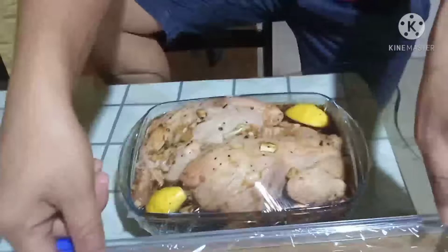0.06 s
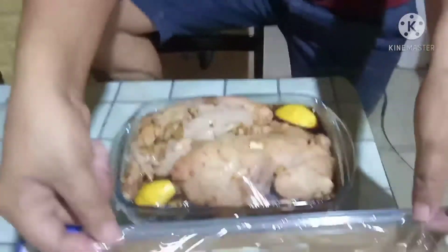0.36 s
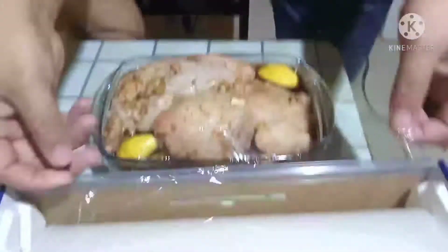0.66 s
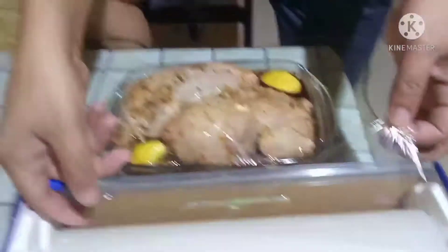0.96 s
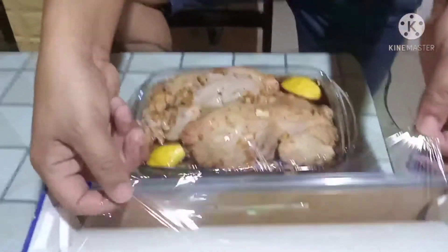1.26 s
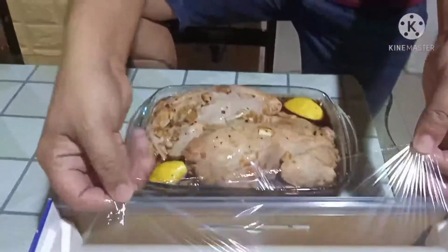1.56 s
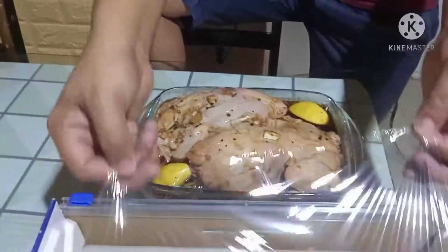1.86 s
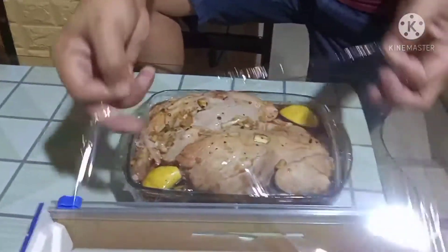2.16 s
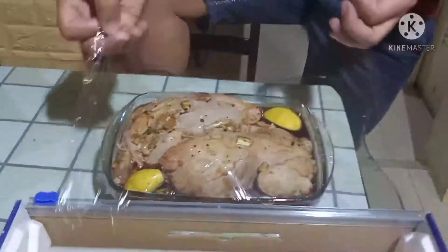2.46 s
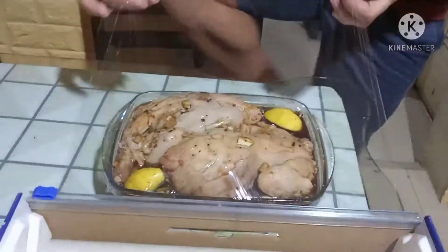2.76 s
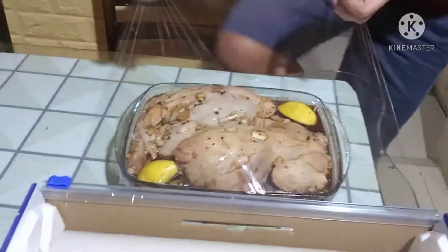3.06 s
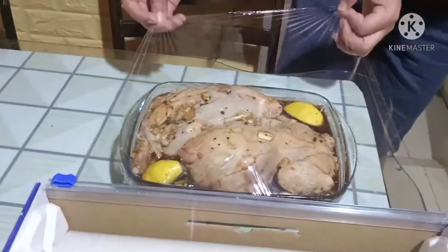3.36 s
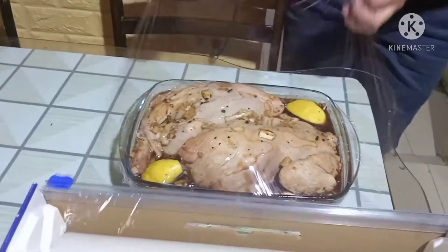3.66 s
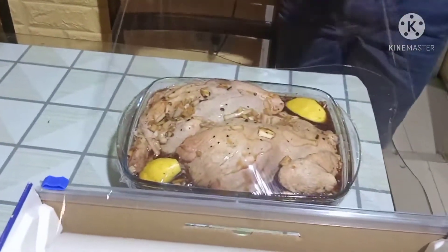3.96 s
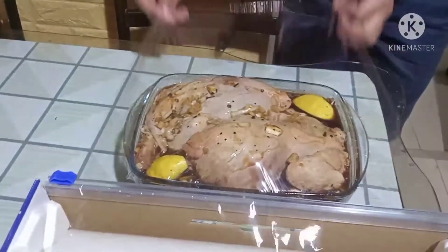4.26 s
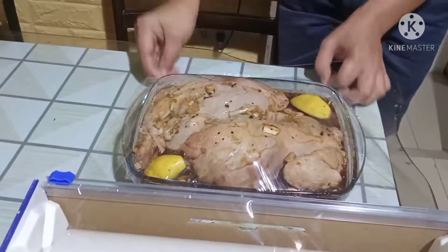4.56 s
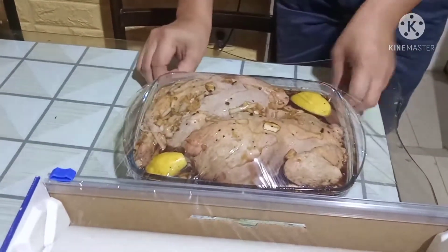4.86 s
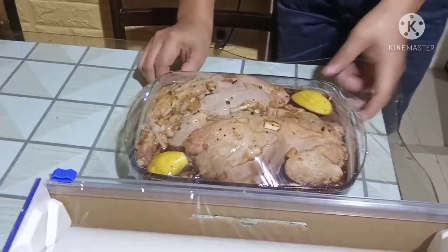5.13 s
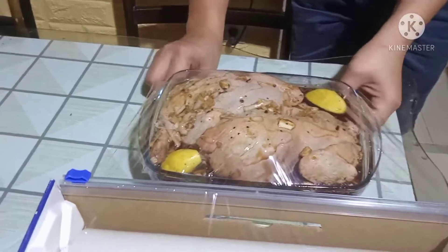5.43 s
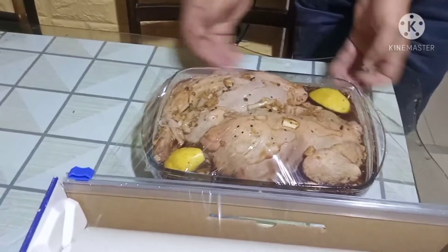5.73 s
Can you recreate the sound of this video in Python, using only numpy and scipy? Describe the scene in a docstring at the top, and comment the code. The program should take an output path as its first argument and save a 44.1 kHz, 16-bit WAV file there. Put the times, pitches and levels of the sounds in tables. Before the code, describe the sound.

Close up, dull taps on a cardboard dispenser mix with bright little ticks as the edge of some plastic wrap is picked up. It peels with a fine hiss, a low flutter and soft bumps from the roll, then squeaks and rips loose loudly. The stretched sheet snaps several times and finally crinkles quietly around a dish's rim. A fan hums steadily in the slightly echoing kitchen.

```python
"""First come knocks on a cardboard box and soft crinkles, over the hum of a fan in a small kitchen.
Cling film ticks as its edge is picked up, then hisses off the roll in countless tiny slips.
The stretched sheet flutters and the roll bumps round in the box. Stuck film squeaks, creases snap,
and two hard tugs rip it loose in a loud rasp. Last, it crinkles as it is pressed over a dish's rim."""
import sys
import numpy as np
from scipy import signal
from scipy.fft import rfft, irfft
from scipy.io import wavfile
from scipy.ndimage import uniform_filter1d

SR = 44100
rng = np.random.default_rng(int(sys.argv[2]) if len(sys.argv) > 2 else 0)


def wav_record(signal):
    """Record a signal, one row per channel, as 16-bit PCM in the file named by sys.argv[1]."""
    frames = np.transpose(np.atleast_2d(signal))
    bounded = np.clip(frames, -1, 1)
    # unit amplitude maps onto the largest positive 16-bit level
    quanta = np.round(bounded * 32767).astype(np.int16)
    wavfile.write(sys.argv[1], SR, quanta)


N = 264335
TIME = np.arange(N) / SR


def from_db(db):
    """Turn decibels into a number to multiply by."""
    return 10 ** (np.asarray(db) / 20)


def rms_one(x):
    """Scale a sound so that its average strength (rms) is 1."""
    return x / np.sqrt(np.mean(x ** 2) + 1e-20)


def steadied(x, seconds):
    """Even out a sound, holding its strength near 1 over each stretch of this length."""
    power = uniform_filter1d(x ** 2, max(2, int(seconds * SR)))
    return x / np.sqrt(np.maximum(power, 1e-4 * np.mean(x ** 2)))


def at_hz(points, hz):
    """Read between the rows of a frequency table, giving each octave equal room."""
    row_hz, value = np.transpose(points)
    return np.interp(np.log(np.maximum(hz, 1)), np.log(row_hz), value)


def add(out, s, sound):
    """Mix a sound in at s seconds."""
    start = max(0, round(s * SR))
    out[start:start + len(sound)] += sound[:N - start]


def band(x, low_hz, high_hz):
    """Keep what lies between two frequencies."""
    bandpass = signal.butter(2, [low_hz, min(high_hz, .45 * SR)], "band", fs=SR, output="sos")
    return signal.sosfilt(bandpass, x + 1e-18)


def coloured(x, spectrum, size=4096):
    """Give a sound the tone colour listed in a table."""
    gains = from_db(at_hz(spectrum, np.arange(size // 2 + 1) * SR / size))
    cepstrum = irfft(np.log(gains))
    cepstrum[1:size // 2] *= 2   # fold the filter so that nothing sounds early (minimum phase)
    cepstrum[size // 2 + 1:] = 0
    return signal.fftconvolve(x, irfft(np.exp(rfft(cepstrum))))[:len(x)]


def registers(x, splits_hz=(900, 5000)):
    """Split a sound into body (low), crack (middle) and sizzle (high)."""
    lowpasses = [signal.butter(3, hz, fs=SR, output="sos") for hz in splits_hz]
    body, body_and_crack = (signal.sosfiltfilt(lowpass, x, padtype=None) for lowpass in lowpasses)
    return body, body_and_crack - body, x - body_and_crack


def envelope(s, length_s, rise_s, fade_s):
    """Rise evenly from time s, hold until length_s is over, then die away."""
    age = TIME - s
    return np.clip(age / rise_s, 0, 1) * np.exp(-np.clip((age - length_s) / fade_s, 0, 30))


def slips(per_s, spread_db):
    """The film lets go in tiny random jumps: many weak, a few strong."""
    sizes = from_db(spread_db * np.minimum(rng.exponential(1, N), 4)) * rng.choice([-1, 1], N)
    return sizes * (rng.random(N) < per_s / SR)


def burst(decay_s, scatter, size=4096):
    """A sharp click, then chatter that swells and dies; scatter sets how strong the chatter is."""
    age = np.arange(size) / (decay_s * SR)
    chatter = rng.standard_normal(size) * age ** .5 * np.exp(-age)
    return signal.unit_impulse(size) + scatter * chatter / np.linalg.norm(chatter)


# tone colour of the moving air: (frequency [Hz], level [dB])
AIR_COLOUR = [(25, -41), (58, 6), (78, -13.5), (98, -4.5), (125, -1), (350, 0), (550, -9), (800, -6),
              (1250, -15), (2200, -15), (3400, -21), (5000, -34), (6400, -46), (8600, -39), (11000, -50.5),
              (15000, -46)]
# the fan motor's tones: (pitch [Hz], level [dB])
MOTOR_TONES = [(150.7, -48.5), (301.5, -57), (586.8, -49.5), (802.1, -53)]
def fan(air_db, hum_db, waver):
    """A fan makes a steady rush of air and a few slightly wavering motor tones."""
    air = rms_one(coloured(rng.standard_normal(N), AIR_COLOUR))
    hum = np.zeros(N)
    for hz, db in MOTOR_TONES:
        drift = waver * np.cumsum(rng.standard_normal(N)) / np.sqrt(SR)
        hum += from_db(db) * np.sin(2 * np.pi * hz * TIME + drift)
    return from_db(air_db) * air + from_db(hum_db) * hum


# tone colour of small creases: (frequency [Hz], level [dB])
CREASE_COLOUR = [(70, -25), (300, -2), (1800, 0), (3300, -4), (5500, -21), (9000, -20), (12000, -23),
                 (15000, -19), (17500, -50)]
# fingers handle the film: (time [s], length [s], body and crack level [dB], sizzle level [dB])
FINGER_GRIPS = [(0.0, 0.06, -30.5, -55), (0.192, .04, -37.5, -58), (0.288, 0.17, -42, -67),
                (0.506, 0.072, -36, -41), (.6, 0.15, -44, -74), (1.685, 0.039, -36, -59.5),
                (3.098, 0.018, -26, -38), (4.107, 0.017, -30, -38), (4.149, 0.022, -28.5, -46),
                (5.285, .025, -39.5, -44), (5.377, .04, -43.5, -45.5), (5.509, 0.17, -43.5, -44),
                (5.654, 0.054, -28.5, -35)]
def crinkles(body_db, crack_db, sizzle_db, idle_per_s=500, busy_per_s=5000):
    """Small creases form as the film is gripped and smoothed; firmer handling makes more of them."""
    firmness, brightness = np.zeros((2, N))
    for s, length, crack_level, sizzle_level in FINGER_GRIPS:
        grip = envelope(s, length, rise_s=0.008, fade_s=0.028)
        firmness += from_db(crack_level) * grip
        brightness += from_db(sizzle_level) * grip
    per_s = idle_per_s + busy_per_s * firmness / firmness.max()
    creases = coloured(slips(per_s, spread_db=3.0), CREASE_COLOUR)
    body, crack, sizzle = (steadied(part, 0.05) for part in registers(creases))
    crunch = from_db(body_db) * body + from_db(crack_db) * crack
    return firmness * crunch + brightness * from_db(sizzle_db) * sizzle


# tone colour of knocked cardboard: (frequency [Hz], level [dB])
CARDBOARD_COLOUR = [(60, -21), (150, -12), (300, -7.5), (520, -4.5), (850, 6.5), (1250, -2), (1800, 5),
                    (2700, 1), (3700, -7), (5500, -32), (8700, -39), (15000, -36)]
# taps on the box and the table: (time [s], knock level [dB], boom level [dB])
BOX_TAPS = [(.001, -6, -15.5), (.011, -17, -14.5), (.044, -11.5, -22.5), (.199, -19, -26.5),
            (.229, -18.5, -27.5), (.738, -10, -34), (.784, -22, -45), (.798, -11.5, -20),
            (.814, -13.5, -21.5), (.864, -12.5, -45), (.982, -22, -33), (1.019, -22, -45),
            (1.083, -22, -47), (1.288, -29, -23.5), (3.247, -28.5, -43), (5.144, -23, -27.5)]
def taps(knock_db, knock_s, boom_db, boom_s, scatter):
    """Cardboard gives a short, dull knock; the hollow box booms a little longer."""
    out = np.zeros(N)
    for s, knock_level, boom_level in BOX_TAPS:
        knock = rms_one(coloured(burst(knock_s, scatter), CARDBOARD_COLOUR))
        boom = rms_one(band(burst(boom_s, scatter), 143, 450))
        add(out, s, from_db(knock_level + knock_db) * knock + from_db(boom_level + boom_db) * boom)
    return out


# tone colour of a tiny wrinkle very close by: (frequency [Hz], level [dB])
WRINKLE_COLOUR = [(500, -31), (1400, -3), (2500, 14.5), (3500, 10.5), (5500, -10.5), (9000, -12),
                  (12000, -10), (15000, 0.5), (17000, -35)]
# the sharpest wrinkles: (time [s], level [dB])
SHARP_TICKS = [(0.231, -32.5), (.3044, -37), (.354, -36.5), (0.391, -31.5), (.412, -25), (0.5095, -27.5),
               (0.5292, -23), (.543, -21), (.5498, -26), (.557, -26), (0.572, -29), (.7833, -32),
               (0.8145, -31.5)]
def ticks(level_db, decay_s, scatter, start_s=0.2, length_s=0.49, faint_per_s=50):
    """Wrinkles click brightly as the film's edge is picked up: a few sharp ones among many faint."""
    count = round(faint_per_s * length_s)
    faint = [(start_s + length_s * (k + rng.random()) / count, rng.normal(-39.5, 0.5))
             for k in range(count)]   # same columns as the sharp ticks
    out = np.zeros(N)
    for s, db in SHARP_TICKS + faint:
        tick = coloured(burst(decay_s, scatter), WRINKLE_COLOUR)
        add(out, s, from_db(db + level_db) * rms_one(tick))
    return out


# tone colour of peeling film: (frequency [Hz], level [dB])
HISS_COLOUR = [(300, 16.5), (800, 14.5), (1200, 7), (2400, 9), (3600, 3), (5500, -15), (8700, -15.5),
               (15500, -28.5)]
# quiet pulls on the film: (time [s], length [s], level at the end [dB])
GENTLE_PULLS = [(0.877, 0.18, -46), (1.3, 0.63, -44.5), (1.988, 0.38, -35), (2.792, 0.23, -39.5),
                (3.024, 0.097, -34), (3.95, 0.16, -39.5)]
def peel(growth_db_per_s):
    """Slow peeling is a fine hiss of countless slips; it grows as each pull gathers speed."""
    hiss = rms_one(coloured(slips(per_s=3000, spread_db=2.5), HISS_COLOUR))
    pulling = np.zeros(N)
    for s, length, end_db in GENTLE_PULLS:
        seconds_left = np.maximum(s + length - TIME, 0)
        growth = from_db(end_db - growth_db_per_s * seconds_left)
        pulling += growth * envelope(s, length, rise_s=0.022, fade_s=0.087)
    return pulling * hiss


# deep tone colour of the stretched sheet: (frequency [Hz], level [dB])
SHEET_COLOUR = [(20, -59.5), (35, -32), (60, -0.5), (110, 2), (165, -2), (240, -11.5), (400, -32.5),
                (600, -50), (850, -31), (1200, -45), (3000, -70.5)]
# moves of the hands that shake the sheet: (time [s], length [s], level [dB])
HAND_MOVES = [(1.267, 0.051, -23), (1.40, 0.25, -19.5), (1.777, 0.2, -19), (2.089, 0.044, -20),
              (2.201, 0.085, -24), (2.423, .3, -25), (2.748, 0.43, -13.5), (3.228, 0.2, -29),
              (3.405, 0.1, -15), (3.563, .05, -16.5), (3.687, 0.14, -27.5), (4.195, 0.063, -23),
              (4.327, 0.057, -24), (4.452, 0.16, -46)]
def flutter(level_db, puff_db=3.5):
    """The wide sheet wobbles like a slack drumhead while the hands move it, in uneven puffs."""
    motion = sum(from_db(db) * envelope(s, length, rise_s=0.019, fade_s=0.029)
                 for s, length, db in HAND_MOVES)
    wobble = rms_one(band(rng.standard_normal(N), 11.6, 30.7))
    puffs = from_db(puff_db * np.tanh(wobble))
    rumble = steadied(coloured(rng.standard_normal(N), SHEET_COLOUR), 0.021)
    return from_db(level_db) * motion * puffs * rumble


# the roll hits its box as the film is tugged: (time [s], level [dB], pitch [Hz])
ROLL_BUMPS = [(1.315, -7.5, 107), (1.485, -9, 112), (1.504, -6, 116), (1.804, -10, 80), (1.913, -3.5, 146),
              (1.974, -1, 131), (2.254, -5, 113), (2.714, -3, 173), (2.745, -1.5, 124), (2.774, -8.5, 177),
              (2.91, 1, 132), (3.017, -2.5, 111), (3.162, -3.5, 97), (3.413, -7, 183), (3.441, -4.5, 152),
              (3.972, -20.5, 89), (4.22, -7, 106)]
def bumps(level_db, swell_s, rattle_db, size=4096):
    """The roll makes soft thuds that swell and die quickly, with a little cardboard rattle."""
    out = np.zeros(N)
    age = np.arange(size) / SR
    swell = (age / swell_s * np.exp(1 - age / swell_s)) ** 2
    for s, db, hz in ROLL_BUMPS:
        thud = np.sin(2 * np.pi * (hz * age + rng.random()))
        rattle = from_db(rattle_db) * rms_one(band(rng.standard_normal(size), 242, 363))
        add(out, s, from_db(db + level_db) * swell * (thud + rattle))
    return out


# squeaks and groans: (time [s], length [s], level [dB], first pitch [Hz], last pitch [Hz])
FILM_SQUEAKS = [(2.375, 0.0099, -36, 2990, 3070), (2.418, 0.0062, -18.5, 2170, 2160),
                (2.43, 0.014, -22.5, 2140, 2190), (2.668, 0.041, -18, 532, 385),
                (2.687, 0.031, -19, 342, 304), (4.121, 0.083, -29.5, 362.3, 466)]
def squeaks(level_db, jitter, overtone_db):
    """Pulled film sticks and slips regularly for a moment, making a short, rough, gliding tone."""
    out = np.zeros(N)
    for s, length, db, first_hz, last_hz in FILM_SQUEAKS:
        progress = np.linspace(0, 1, int(length * SR))
        glide_hz = first_hz + (last_hz - first_hz) * progress
        roughness = rms_one(band(rng.standard_normal(len(progress)), 100, 900))
        phase = 2 * np.pi * np.cumsum(glide_hz * (1 + jitter * roughness)) / SR
        tone = np.sin(phase) + from_db(overtone_db) * np.sin(2 * phase)
        swell = np.sqrt(4 * progress * (1 - progress))
        add(out, s, from_db(db + level_db) * swell * tone)
    return out


# tone colour of tight film, snapping or ripping: (frequency [Hz], level [dB])
FILM_COLOUR = [(70, -22), (200, -5), (360, 0), (570, -9), (850, -3), (1250, -9), (1820, -3), (2700, -8),
               (3400, -7), (4600, -22), (6400, -27), (8700, -23), (12500, -31), (15300, -28), (17500, -55)]
# snaps: (time [s], crack level [dB], body level [dB], sizzle level [dB], chatter fade time [s])
CREASE_SNAPS = [(2.4195, -13.5, -28, -38, 0.0031), (2.4364, -25, -12, -44, 0.0054),
                (2.5646, -0.5, -18, -23, 0.0052), (3.1097, -12.5, -16, -36, 0.0016),
                (3.1162, -29, -14, -32, 0.0048), (3.1493, -21.5, -16.5, -30, 0.0031),
                (3.2627, -49, -21, -41.5, 0.0024), (3.3072, -44, -29, -38.5, 0.0013),
                (3.3493, -20, -38, -29, 0.0011), (3.3627, -23.5, -28, -43, 0.0061),
                (3.5318, -32, -45, -39, 0.0028), (3.6868, -33, -37, -36.5, .0015),
                (3.7175, -29.5, -34.5, -30.5, 0.001), (3.7324, -18, -29, -32.5, 0.0052),
                (3.763, 2.5, -5.5, -21, 0.00078), (3.7677, 0.5, -5, -20, 0.0054),
                (3.8163, -6.5, -14.5, -26, 0.0048), (3.9804, -26.5, -49.5, -50, .0048),
                (4.1035, -16, -25.5, -26.5, 0.0021), (4.1613, -21, -27, -33.5, 0.0023),
                (4.1817, -33, -16, -38.5, .0025), (4.5586, -33, -42, -49.5, 0.0078),
                (5.301, -35, -31, -45.5, .0015), (5.504, -39, -33, -41, 0.0031),
                (5.6627, -19.5, -35, -44, 0.0033)]
def snaps(body_db, crack_db, sizzle_db):
    """A crease lets go; a tight small one only sizzles, a big one shakes the whole sheet."""
    out = np.zeros(N)
    for s, crack, body, sizzle, decay_s in CREASE_SNAPS:
        click = coloured(burst(decay_s, scatter=3), FILM_COLOUR)
        levels_db = (body + body_db, crack + crack_db, sizzle + sizzle_db)
        for part, db in zip(registers(click), levels_db):
            add(out, s, from_db(db) * rms_one(part))
    return out


# two hard tugs: (time [s], length [s], time to full speed [s], body level [dB])
HARD_TUGS = [(2.433, 0.12, 0.078, -16.5), (2.563, 0.094, .006, -14)]
# how the rip's body, crack and sizzle follow the tug: (power of the speed [no unit], fade time [s])
RIP_RESPONSE = [(.15, 0.07), (.8, 0.012), (1.25, .012)]
def rip(body_db, crack_db, sizzle_db):
    """Stuck film tears off in dense slips, brighter with speed; the low drone outlasts the highs."""
    jerks = from_db(2.5 * rms_one(band(rng.standard_normal(N), 60, 400)))   # the film lets go unevenly
    rasp = coloured(jerks * slips(per_s=4500, spread_db=2.5), FILM_COLOUR)
    out = np.zeros(N)
    for k, part in enumerate(registers(rasp)):
        power, fade_s = RIP_RESPONSE[k]
        strongest = np.zeros(N)
        for s, length, rise_s, body in HARD_TUGS:
            db = (body + body_db, crack_db, sizzle_db)[k]
            tug = envelope(s, length, rise_s, fade_s * power) ** power
            sounding = TIME < s + length + 5 * fade_s
            strongest = np.maximum(strongest, from_db(db) * tug * sounding)
        out += strongest * steadied(part, 0.043)
    return out


# notes at which the hollow box rings: (pitch [Hz], width [Hz], added strength [no unit])
BOX_NOTES = [(290.5, 12, 1), (746, 35, .45), (871, 34, .45), (1806, 45, 0.3), (2190, 19, 0.15),
             (3380, 180, 0.36)]
def box_ring(x):
    """The box adds its own ring to whatever shakes it."""
    return x + sum(gain * signal.lfilter(*signal.iirpeak(hz, hz / width, fs=SR), x + 1e-18)
                   for hz, width, gain in BOX_NOTES)


# how long the kitchen echoes: (frequency [Hz], time to fade by 60 dB [s])
ECHO_TIMES = [(300, 0.42), (800, 0.64), (2100, 0.33), (5500, 0.16), (14600, 0.29)]
def kitchen(x, echo_db, build_s, size=32768):
    """Hard walls add a blur of echoes; notes near 5 kHz die first, while the mids ring longest."""
    age = np.arange(size) / SR
    noise = rng.standard_normal((2, size))
    edges_hz = np.geomspace(200, 18000, 10)
    tail = np.zeros(size)
    for k, (low, high) in enumerate(zip(edges_hz, edges_hz[1:])):
        fade_s = at_hz(ECHO_TIMES, np.sqrt(low * high))
        tail += band(noise[k % 2], low, high) * from_db(-60 * age / fade_s)
    tail *= 1 - np.exp(-age / build_s)
    return x + from_db(echo_db) * signal.fftconvolve(x, tail / np.linalg.norm(tail))[:N]


def scene():
    """Film and box close by, with the kitchen and its fan around them."""
    film = snaps(body_db=-17.5, crack_db=-21.0, sizzle_db=-15.5)
    film += rip(body_db=-2.5, crack_db=-16.5, sizzle_db=-28)
    film += crinkles(body_db=-11.5, crack_db=-5.0, sizzle_db=-11.5)
    film += peel(growth_db_per_s=14.5)
    film += squeaks(level_db=5.5, jitter=0.05, overtone_db=-19.0)
    knocks = taps(knock_db=-22.5, knock_s=0.004, boom_db=-17.0, boom_s=0.0085, scatter=1.95)
    wrinkles = ticks(level_db=-17.5, decay_s=0.00097, scatter=0.84)
    mix = kitchen(wrinkles, echo_db=-10.0, build_s=0.002)   # nearest, so less echo
    rumble = bumps(level_db=-2.0, swell_s=0.007, rattle_db=-21.0) + flutter(level_db=-2.0)
    mix += band(rumble, 48.5, 5000)
    mix += kitchen(box_ring(film + knocks), echo_db=-8.0, build_s=0.0032)
    mix += fan(air_db=-39.0, hum_db=-0.5, waver=6.08)
    return mix[None]


def record(dry, ring_hz=8650, ceiling=0.95, cutoff_hz=15700):
    """The microphone's opening rings high up, the loudest peaks flatten, the very top is cut."""
    sound = dry + 1.8 * signal.lfilter(*signal.iirpeak(ring_hz, Q=10, fs=SR), dry)
    flattened = sound / (1 + (sound / ceiling) ** 8) ** (1 / 8)
    return signal.sosfilt(signal.butter(20, cutoff_hz, fs=SR, output="sos"), flattened)


dry = scene()
out = record(dry)
wav_record(out)
```